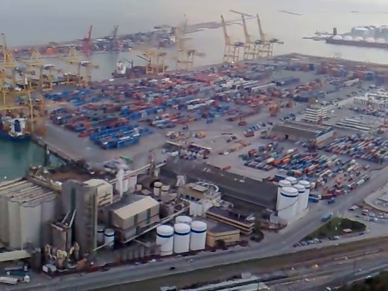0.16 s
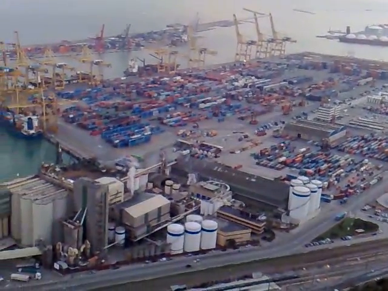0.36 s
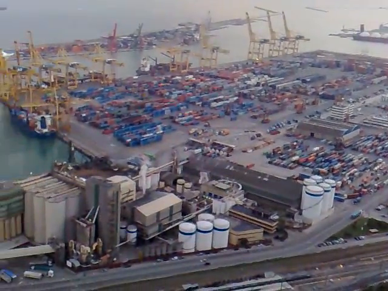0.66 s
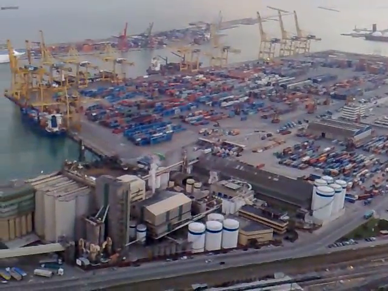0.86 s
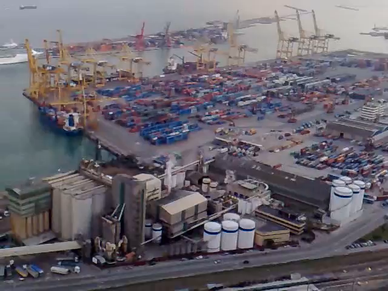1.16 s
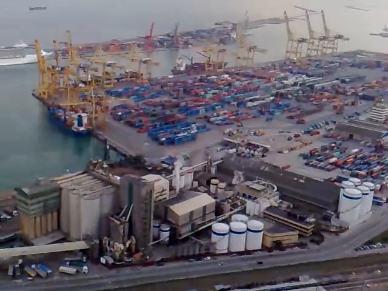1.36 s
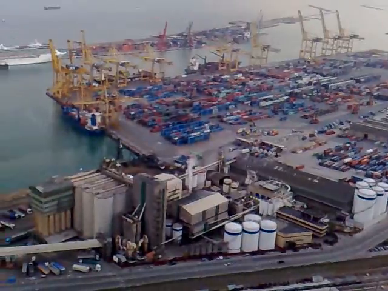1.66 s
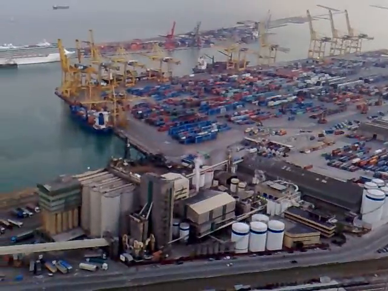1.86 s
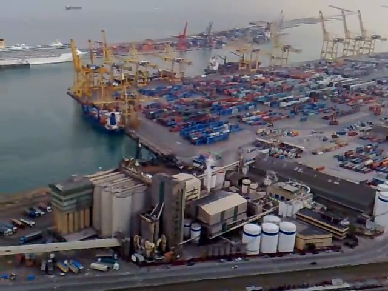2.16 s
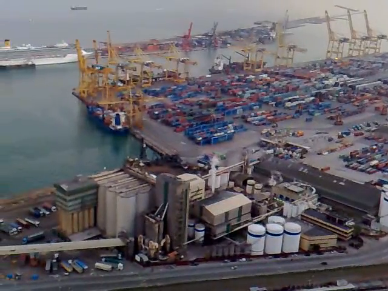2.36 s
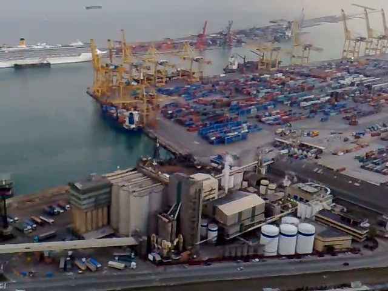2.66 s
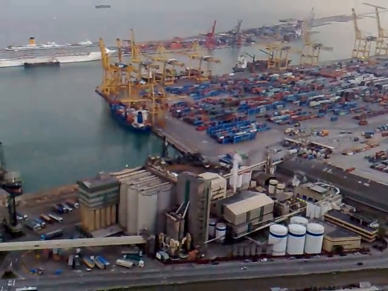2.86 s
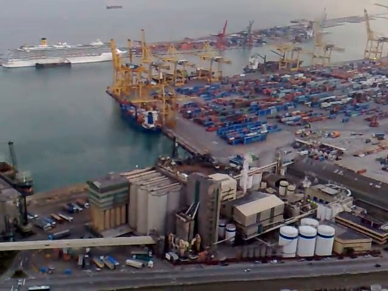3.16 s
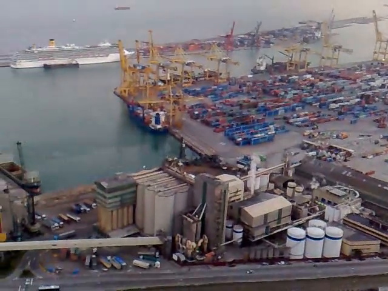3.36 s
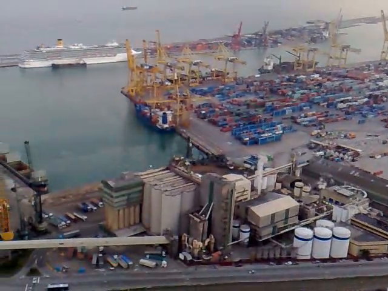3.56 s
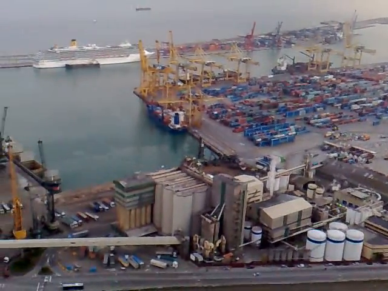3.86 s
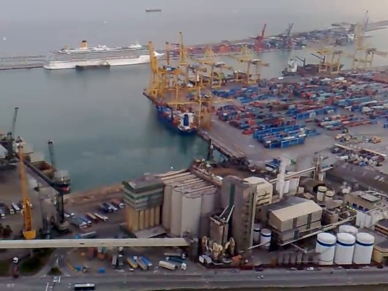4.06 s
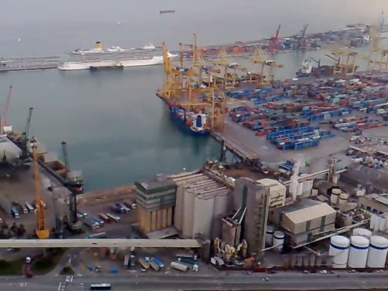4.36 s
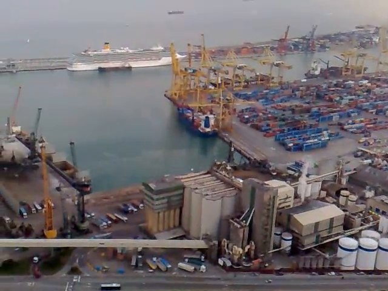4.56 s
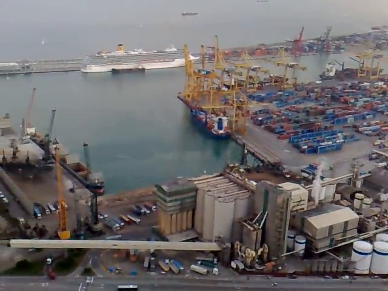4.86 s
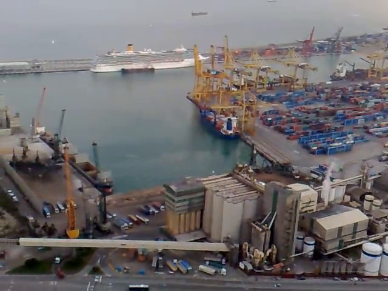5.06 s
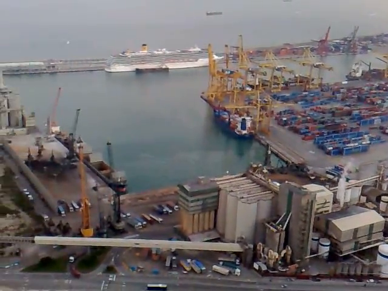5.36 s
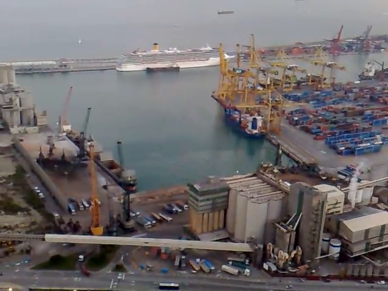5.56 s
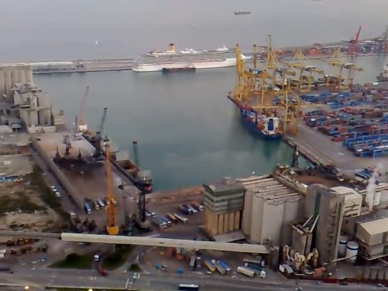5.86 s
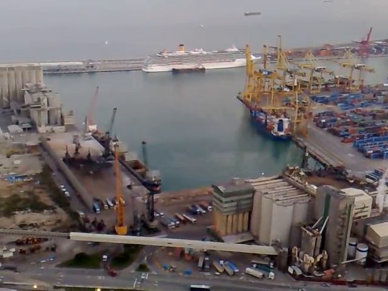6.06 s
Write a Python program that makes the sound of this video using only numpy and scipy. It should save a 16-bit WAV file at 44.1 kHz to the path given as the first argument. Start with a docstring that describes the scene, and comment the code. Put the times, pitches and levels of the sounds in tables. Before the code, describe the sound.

Distant port and road rumble over deep droning engines, two faint brake squeals, then loud muffled bumps and rubbing from a hand on the device.

```python
"""A container port and its roads, heard from high above: filtered noise makes a steady far roar
over the drifting sine tones of ships' engines and plant. A lorry's exhaust note climbs in pitch; two faint
brake squeals of paired sines and some thin chirps of narrow-band noise carry up from the yard.
Fingertips scrape now and then; later the hand that turns the camera knocks on its case as damped swings
and rubs it as dull noise, the case clicks three times, and the background sinks for a moment."""
import sys
import numpy as np
from scipy import signal
from scipy.fft import rfft, irfft, next_fast_len
from scipy.io import wavfile
from scipy.ndimage import uniform_filter1d

SR = 44100
rng = np.random.default_rng(int(sys.argv[2]) if len(sys.argv) > 2 else 0)


def to_wav(sig):
    """Store sig (one row per channel, or 1-D mono) as 16-bit WAV at the path in sys.argv[1].

    Samples outside -1..1 are clipped; the rate is SR.
    """
    pcm = np.clip(np.atleast_2d(sig), -1, 1) * 32767
    pcm = np.round(pcm).astype(np.int16)
    wavfile.write(sys.argv[1], SR, pcm.T)  # frames by channels


N = 273861
TIME = np.arange(N) / SR

# Far traffic and machinery. Each row: frequency in Hz, relative density in dB per Hz.
ROAR_SPECTRUM = [(15, -33.5), (26, -13), (38, -1), (50, 2), (66, -1), (92, 0.5), (120, -2), (200, -3.5),
                 (245, -5.5), (295, -6.5), (400, -15.5), (650, -10.5), (950, -14.5), (1200, -14.5),
                 (1450, -19), (1900, -18), (2200, -26), (2500, -29)]
# The same roar higher up, where the air absorbs it. Each row: frequency in Hz, relative density in dB per Hz.
ROAR_TREBLE = [(3200, -34.5), (3850, -35), (4400, -42.5), (5000, -51.5), (7000, -60), (16000, -74)]
ROAR_DB = -29  # rms, before the dip
# How far each band follows the traffic. Each row: frequency in Hz, share of the tyre level (0 to 1).
TYRE_SHARE = [(100, 0.29), (350, 1), (700, 0.78), (1800, 1), (3000, 0)]
# Tyre noise ebbs steadily as the camera turns; the band's share scales both values.
TYRE_START_DB, TYRE_EBB_DB_PER_S = 0.75, 0.45
# Brief swells of the tyre noise. Each row: time of the top in seconds, lift in dB, centre in Hz,
# width in octaves (centre to 1/e of the lift).
TYRE_SWELLS = [(1.364, 6.2, 717, 0.83), (3.79, 2.7, 1050, 1.9)]
SWELL_WIDTH_S = 0.071  # from the top to 1/e of the lift

# Steady hum of plant and fans. Each row: frequency in Hz, level in dB rms before the dip, rms drift in Hz.
PLANT_TONES = [(158.9, -41, 0.38), (470.4, -53, 1.5), (558.7, -52, 5), (957, -59.5, 1.6),
               (1166, -51.5, 10.7), (2340, -60, 16.76)]
# The deep drone of a ship's engine; its rms level is before the dip.
DRONE_HZ, DRONE_DB = 74.9, -31
# A far lorry gathers speed. Each row: time in seconds, firing rate in Hz, level in dB rms before the dip.
LORRY_COURSE = [(0, 82, -43), (0.901, 84.5, -35), (1.6, 89.5, -36), (2.4, 93.83, -34.5), (3.3, 98, -38),
                (6.2, 100, -37)]
LORRY_OCTAVE_DB = -10  # relative to the exhaust note

# Microphone hiss. Each row: frequency in Hz, relative density in dB per Hz.
HISS_SPECTRUM = [(1000, 2), (6000, 4.4), (11000, 0.5), (15500, 4)]
HISS_DB = -67  # before flicker and dip

# Small scrapes of the fingers. Each row: start in seconds, level in dB rms, length in seconds,
# pitch in Hz, sharpness Q (no unit).
FINGER_SCRAPES = [(1.77, -71, .03, 5500, 1.5), (2.443, -65, 0.051, 7900, 1.4), (3.443, -68, .02, 5800, 1.6),
                  (3.935, -65, .025, 4780, 2), (4.31, -62, .016, 6000, 6.6),
                  (4.416, -64.5, .018, 6000, 2.66), (4.43, -67, 0.022, 5700, 3)]

# Far squeals of a brake. Each row: start in seconds, length in seconds, level in dB rms
# before the note's own level, change of level in dB per second.
BRAKE_SQUEALS = [(3.415, 0.12, -48.5, -50), (3.607, 0.087, -51.5, 30)]
# The two notes of that brake. Each row: frequency in Hz, level in dB relative to the squeal.
BRAKE_NOTES = [(3066, -0.5), (2762, -5.5)]

# Knocks of the hand on the case. Each row: start in seconds, peak in dB before the common trim
# and the skin's low-pass, pitch in Hz.
HAND_KNOCKS = [(4.518, -15, 111), (4.526, -11, 200), (4.5299, -3, 78.5), (4.5335, -14, 246),
               (4.5367, -9, 423), (4.5378, -18, 800), (4.546, -4.5, 60), (4.553, -15, 380),
               (4.58, -11, 150), (4.594, -15, 175), (4.605, -16, 55), (4.6225, -19.5, 320),
               (4.635, -16, 142), (4.647, -18, 110), (4.8097, -8.5, 109), (4.8235, -20, 129.7),
               (4.849, -18, 136), (4.859, -18.5, 260), (4.866, -14.5, 130), (4.9065, -18, 149),
               (4.9174, -14.5, 334), (4.9274, -12, 120), (4.934, -15, 243), (5.005, -16, 151),
               (5.048, -11, 167), (5.058, -9.5, 174), (5.064, -18.5, 302), (5.072, -13, 90),
               (5.0875, -12.5, 183), (5.099, -14.5, 170), (5.104, -17.5, 380), (5.114, -19, 310),
               (5.167, -19, 182), (5.188, -10, 125), (5.199, -14.5, 201), (5.2145, -17, 360),
               (5.221, -13, 192), (5.794, -13.5, 203), (5.7987, -14.5, 130.2), (5.861, -24, 160),
               (5.908, -16.5, 228), (5.938, -12.5, 89), (5.95, -19.5, 250), (5.983, -17.5, 130),
               (6.125, -19, 70), (6.173, -14.5, 159.2)]
RING_CYCLES = 3.84  # swings in which the decay of a knock falls by 60 dB
# The case gives a second, higher note with every knock: ratio of pitch, level relative to the first note.
OVERTONE_RATIO, OVERTONE_DB = 1.92, -16.5
SKIN_HZ = 1300  # soft skin passes little above this

# The grip shifts and rubs. Each row: start in seconds, length in seconds, level in dB rms at full pressure.
GRIP_RUBS = [(4.519, 0.031, -19.5), (4.566, 0.15, -30), (4.786, 0.079, -29.5), (4.977, 0.041, -28.5),
             (5.053, 0.068, -29), (5.182, 0.054, -32), (5.886, 0.087, -32), (6.109, 0.13, -33)]
# Each rub rises quickly, holds until its length is up and dies away with this time constant.
RUB_ATTACK_S, RUB_RELEASE_S = 0.006, 0.018
# Dull colour of the case. Each row: frequency in Hz, relative density in dB per Hz.
CASE_SPECTRUM = [(20, -9), (55, -3), (170, 4.5), (330, -3), (550, -24.5), (1000, -38.5), (8000, -100)]

# The background sinks steadily, then comes back faster; the hiss follows fully, the port by a share.
DIP_AT_S, DIP_DB, SINK_DB_PER_S, RETURN_DB_PER_S = 5.31, -8, 11, 19

# Thin chirps of a wheel, all on one note. Each row: start in seconds, length in seconds, level in dB rms.
WHEEL_CHIRPS = [(4.6, 0.08, -61), (4.866, 0.058, -56.5), (4.995, 0.045, -62), (5.1, .07, -62.5)]
CHIRP_HZ, CHIRP_WIDTH_HZ = 3810, 35  # the width runs from the centre to half amplitude

# The case creaks in a quick run of clicks. Each row: start in seconds, gain in dB of ring and snap together.
CREAK_CLICKS = [(5.215, -45), (5.2215, -43.5), (5.2272, -44.5)]
# What a click rings. Each row: frequency in Hz, starting level in dB relative to the click,
# time to fall by 60 dB in seconds.
CREAK_MODES = [(3650, -2, 0.025), (4050, -6, 0.025), (5330, -6.5, .026), (6220, -13, 0.028),
               (7000, -11, 0.028)]
# The dry snap that starts each click. Each row: frequency in Hz, relative density in dB per Hz.
SNAP_SPECTRUM = [(1500, -4), (3700, 12), (7000, -2), (9000, -10), (15000, -16)]
SNAP_DB, SNAP_T60_S, CLICK_RISE_S = -3, 0.032, 0.00094  # the snap's level is relative to the click

EDGE_HZ = 15800  # upper limit of the whole sound


def gain_of(db):
    """Amplitude is ten to the power of decibels over twenty."""
    return 10 ** (np.asarray(db) / 20)


def evened(x):
    """Normalisation: dividing by the root mean square leaves an rms of one."""
    return x / np.sqrt(np.mean(x ** 2) + 1e-20)


def read(points, hz):
    """Interpolation: a spectrum joined by straight lines on a log-frequency axis."""
    f, value = np.transpose(points)
    return np.interp(np.log(hz + 1), np.log(f + 1), value)


def add(mix, s, sound):
    """Superposition: a sound starting at s seconds adds to the mix."""
    part = mix[round(s * SR):][:len(sound)]
    part += sound[:len(part)]


def noise(colour):
    """Spectral shaping: white noise weighted to the given spectrum, at an rms of one."""
    size = next_fast_len(N)
    spectrum = rfft(rng.standard_normal(size))
    shape = gain_of(read(colour, np.fft.rfftfreq(size, 1 / SR)))
    return evened(irfft(spectrum * shape, size)[:N])


def wander(rate, t):
    """Random modulation: sines from rate/20 to rate in Hz, sampled at 2048 knots, with an rms of one."""
    knots = np.linspace(0, N / SR, num=2048)
    f = rate * np.geomspace(1 / 20, 1, num=24)[:, None]
    waves = np.sin(2 * np.pi * (f * knots + rng.random(f.shape))) / np.sqrt(f)
    return np.interp(t, knots, evened(waves.sum(0)))


def roar(patchy_db=1.0, flutter_db=0.39):
    """Incoherent sum: countless engines and tyres merge into noise, made patchy by moving air."""
    hz, t, z = signal.stft(rng.standard_normal(N), SR, nperseg=1024, noverlap=768)
    # smoothing over frequency, then over time, turns chance into patches
    patches = uniform_filter1d(rng.standard_normal(z.shape), size=9, axis=0)
    patches = evened(uniform_filter1d(patches, size=20, axis=1))
    tyres_db = TYRE_START_DB - TYRE_EBB_DB_PER_S * t + flutter_db * wander(5.3, t)
    traffic_db = read(TYRE_SHARE, hz)[:, None] * tyres_db
    z = z * gain_of(read(ROAR_SPECTRUM + ROAR_TREBLE, hz))[:, None]
    z = z * gain_of(patchy_db * patches + traffic_db + swells(hz, t))
    sound = signal.istft(z, nperseg=1024, noverlap=768)[1][:N]
    return gain_of(ROAR_DB) * evened(sound)


def hum(fading_db=0.9):
    """Frequency modulation: each machine's tone drifts a little and fades on its long way up."""
    out = np.zeros(N)
    for hz, db, drift in PLANT_TONES:
        turns = np.cumsum(hz + drift * wander(14, TIME)) / SR
        fading = gain_of(fading_db * wander(1.2, TIME))
        out += gain_of(db) * evened(fading * np.sin(2 * np.pi * turns))
    return out


def drone(drift_hz=0.2, swell_db=1.8):
    """Amplitude modulation: one deep, nearly pure engine tone swells a little with the air."""
    turns = np.cumsum(DRONE_HZ + drift_hz * wander(4.88, TIME)) / SR
    swell = gain_of(swell_db * wander(6.2, TIME))
    return gain_of(DRONE_DB) * evened(swell * np.sin(2 * np.pi * turns))


def lorry(drift_hz=0.58, fading_db=3.0):
    """Periodic firing: the exhaust note and its octave climb slowly and level off."""
    s, hz, db = np.transpose(LORRY_COURSE)
    turns = np.cumsum(np.interp(TIME, s, hz) + drift_hz * wander(8, TIME)) / SR
    note = np.sin(2 * np.pi * turns) + gain_of(LORRY_OCTAVE_DB) * np.sin(2 * np.pi * 2 * turns)
    fading = gain_of(fading_db * wander(4.6, TIME))
    return gain_of(np.interp(TIME, s, db)) * evened(fading * note)


def hiss(dip_db, flicker_db=0.8):
    """Self-noise: the microphone's faintly flickering random hiss follows the dip in full."""
    return gain_of(HISS_DB + dip_db + flicker_db * wander(25, TIME)) * noise(HISS_SPECTRUM)


def swells(hz, t):
    """Gaussian weighting in time and log frequency lifts one band of the roar for a moment, in dB."""
    lift_db = 0
    for s, db, centre, octaves in TYRE_SWELLS:
        in_time = ((t - s) / SWELL_WIDTH_S) ** 2
        in_pitch = (np.log2((hz[:, None] + 1) / centre) / octaves) ** 2
        lift_db = lift_db + db * np.exp(-in_time - in_pitch)
    return lift_db


def scrapes(grit_db=3.0, ribs_db=1.3):
    """Friction: a fingertip near the microphone catches unevenly and rasps in a ragged resonance."""
    out, f = np.zeros(N), np.geomspace(100, SR / 2, num=600)
    for s, db, length, hz, q in FINGER_SCRAPES:
        t = s + np.arange(int(length * SR)) / SR
        pressure = signal.windows.tukey(len(t), 0.5) * gain_of(grit_db * wander(250, t))
        ribs = evened(uniform_filter1d(rng.standard_normal(len(f)), size=3))
        resonance_db = -10 * np.log10(1 + (q * (f / hz - hz / f)) ** 2)
        colour = np.column_stack([f, ribs_db * ribs + resonance_db])
        add(out, s, gain_of(db) * evened(pressure * noise(colour)[:len(t)]))
    return out


def sing(hz, length, change, waver=0.0042, flutter_db=2.0):
    """Self-excited vibration: rubbing metal sings one slightly unsteady note."""
    t = np.arange(int(length * SR)) / SR
    level = signal.windows.tukey(len(t), 0.35) * gain_of(flutter_db * wander(40, t) + change * t)
    turns = np.cumsum(hz * (1 + waver * wander(110, t))) / SR
    return evened(level * np.sin(2 * np.pi * turns))


def squeals():
    """Superposition of modes: the brake sings two notes at once."""
    out = np.zeros(N)
    for s, length, db, change in BRAKE_SQUEALS:
        for hz, note_db in BRAKE_NOTES:
            add(out, s, gain_of(db + note_db) * sing(hz, length, change))
    return out


def knocks(rise_cycles=0.39, trim_db=-1.1):
    """Damped oscillation: soft flesh pushes the case, which soon stops; higher knocks start faster."""
    out, t = np.zeros(N), np.arange(SR // 4) / SR
    for s, db, hz in HAND_KNOCKS:
        cycles = t * hz
        push = (1 - np.exp(-(cycles / rise_cycles) ** 2)) * gain_of(-60 * cycles / RING_CYCLES)
        overtone = gain_of(OVERTONE_DB) * np.sin(2 * np.pi * OVERTONE_RATIO * cycles)
        swing = push * (np.sin(2 * np.pi * cycles) + overtone)
        add(out, s, gain_of(trim_db + db) * swing / abs(swing).max())
    return signal.sosfilt(signal.butter(2, SKIN_HZ, fs=SR, output="sos"), out)


def grip(lumpy_db=3.0):
    """Stick-slip friction: skin on the case gives an uneven dull rumble with each shift of the hand."""
    out, t = np.zeros(N), np.arange(SR // 2) / SR
    for s, length, db in GRIP_RUBS:
        release = np.exp(-np.maximum(t - length, 0) / RUB_RELEASE_S)
        pressure = np.minimum(t / RUB_ATTACK_S, 1) * release
        rumble = noise(CASE_SPECTRUM)[:len(t)] * gain_of(lumpy_db * wander(70, s + t))
        rumble = rumble / np.std(rumble[t < length + RUB_RELEASE_S])
        add(out, s, gain_of(db) * pressure * rumble)
    return out


def dip(t):
    """Exponential gain change: the level in dB takes one ramp down and one ramp back up."""
    sinking = SINK_DB_PER_S * (DIP_AT_S - t)
    returning = RETURN_DB_PER_S * (t - DIP_AT_S)
    return np.minimum(DIP_DB + np.maximum(sinking, returning), 0)


def chirps():
    """Narrow-band noise: a wheel rasps on one note, blurred as by echoes across the yard."""
    out, f = np.zeros(N), np.fft.rfftfreq(SR, 1 / SR)
    for s, length, db in WHEEL_CHIRPS:
        size = int(length * SR)
        band = irfft(rfft(rng.standard_normal(SR)) / (1 + ((f - CHIRP_HZ) / CHIRP_WIDTH_HZ) ** 2))
        add(out, s, gain_of(db) * evened(signal.windows.tukey(size, 0.5) * band[:size]))
    return out


def creak():
    """Impulse excitation: a seam of the case slips in steps; each snaps and rings the plastic's modes."""
    out, t = np.zeros(N), np.arange(SR // 10) / SR
    for s, db in CREAK_CLICKS:
        ring = np.zeros(len(t))
        for hz, mode_db, t60 in CREAK_MODES:
            ring += gain_of(mode_db - 60 * t / t60) * np.sin(2 * np.pi * hz * t)
        snap = gain_of(SNAP_DB - 60 * t / SNAP_T60_S) * noise(SNAP_SPECTRUM)[:len(t)]
        add(out, s, gain_of(db) * np.minimum(t / CLICK_RISE_S, 1) * (ring + snap))
    return out


def scene(dip_share=0.26):
    """Superposition: the far port, the microphone's hiss and the hand close by add up."""
    dip_db = dip(TIME)
    background = (roar() + hum() + drone() + lorry()) * gain_of(dip_share * dip_db)
    yard = squeals() + chirps()
    hand = scrapes() + knocks() + grip() + creak()
    return (background + yard + hiss(dip_db) + hand)[None]


def record(dry):
    """Band limiting: a symmetric low-pass filter ends the spectrum around EDGE_HZ."""
    low_pass = signal.firwin(511, EDGE_HZ, window=("kaiser", 9), fs=SR)
    return signal.oaconvolve(dry, low_pass[None], "same")


dry = scene()
out = record(dry)
to_wav(out)
```